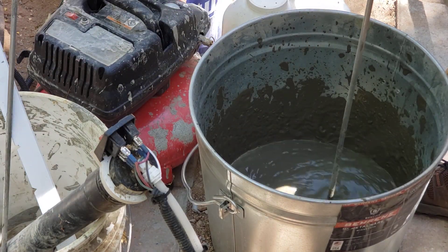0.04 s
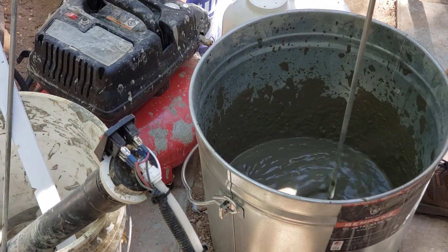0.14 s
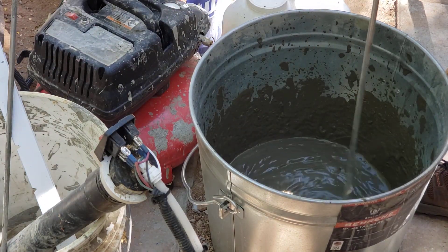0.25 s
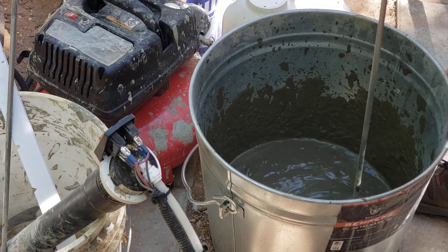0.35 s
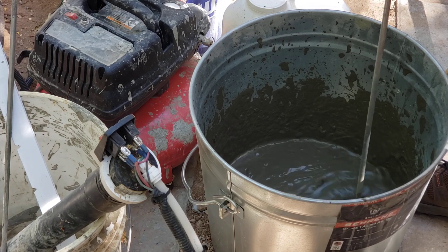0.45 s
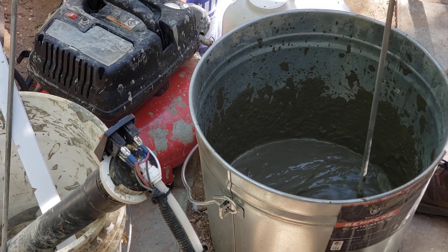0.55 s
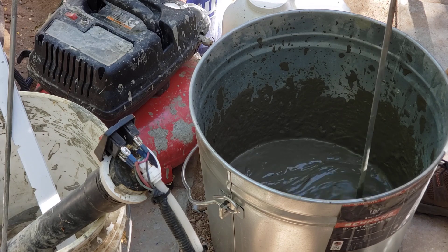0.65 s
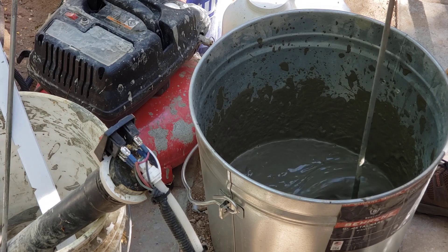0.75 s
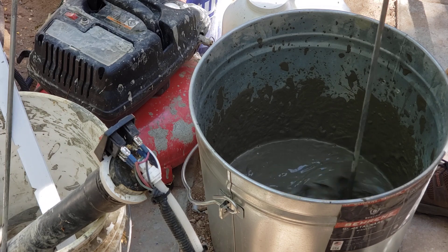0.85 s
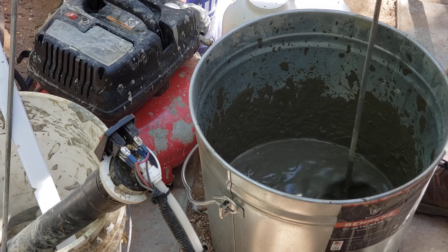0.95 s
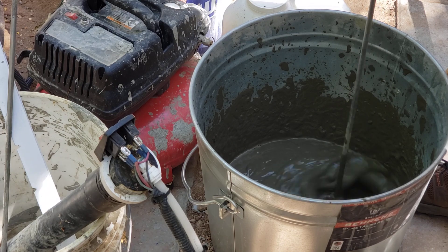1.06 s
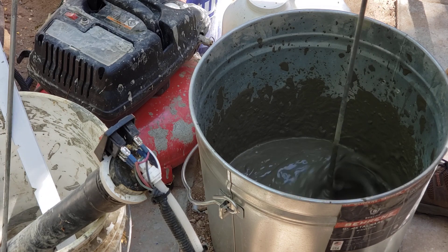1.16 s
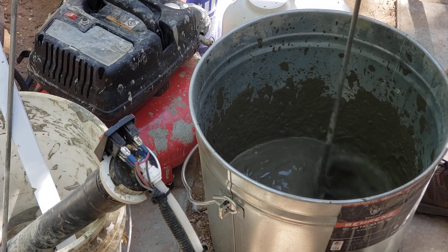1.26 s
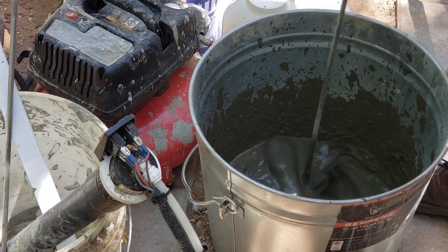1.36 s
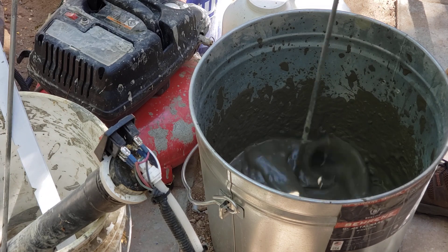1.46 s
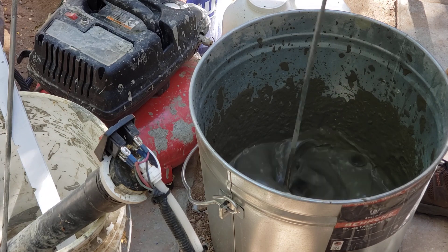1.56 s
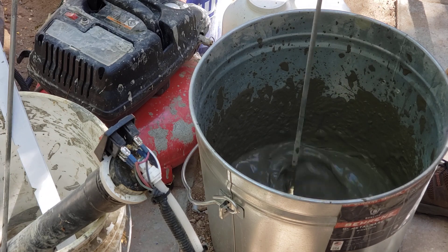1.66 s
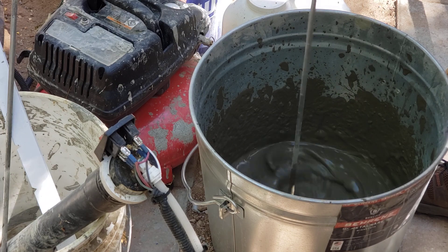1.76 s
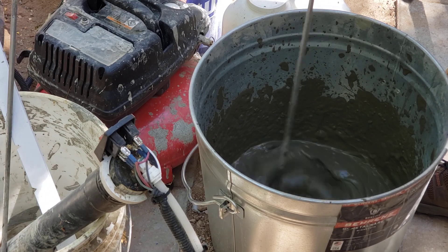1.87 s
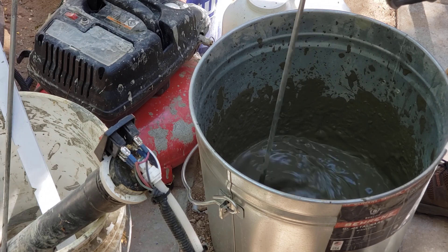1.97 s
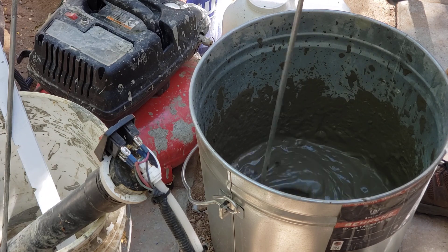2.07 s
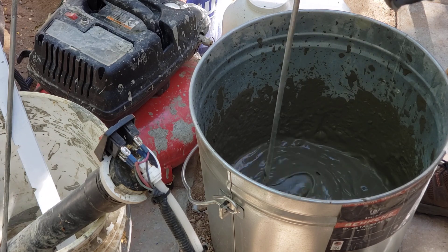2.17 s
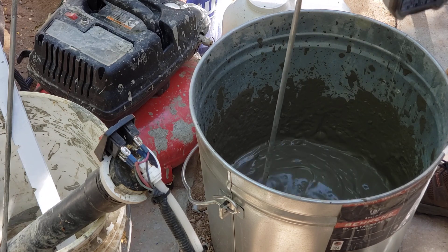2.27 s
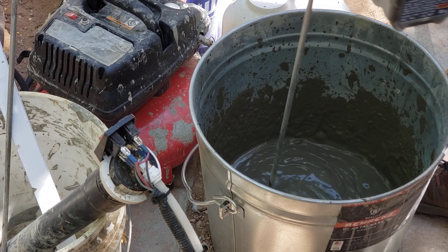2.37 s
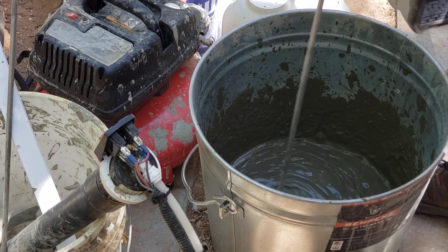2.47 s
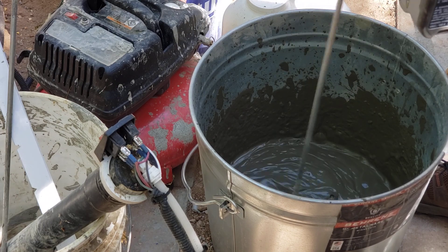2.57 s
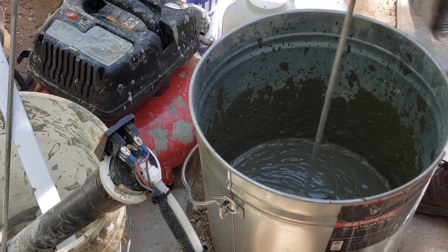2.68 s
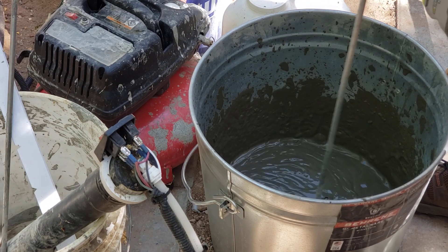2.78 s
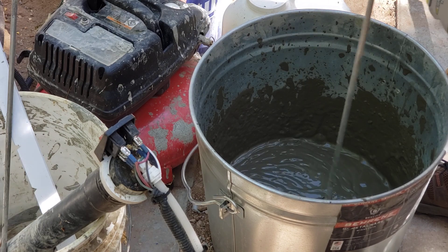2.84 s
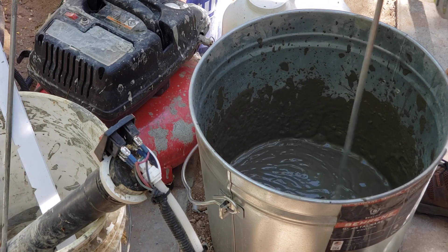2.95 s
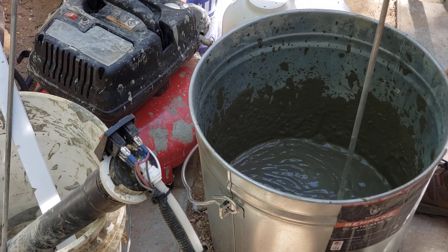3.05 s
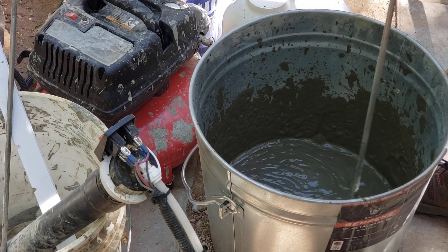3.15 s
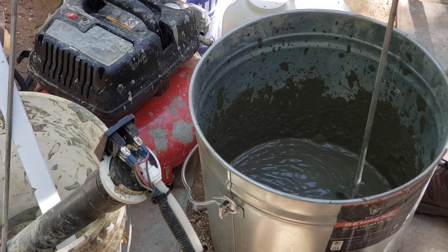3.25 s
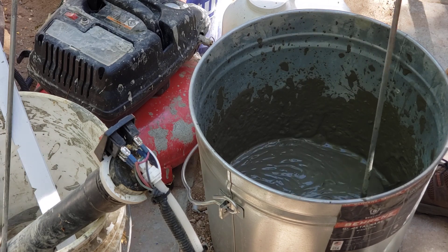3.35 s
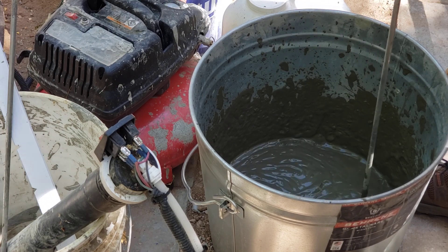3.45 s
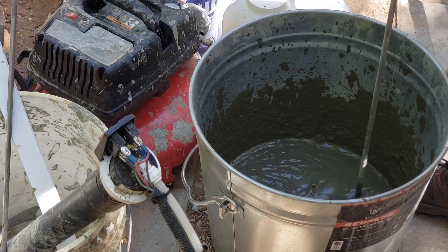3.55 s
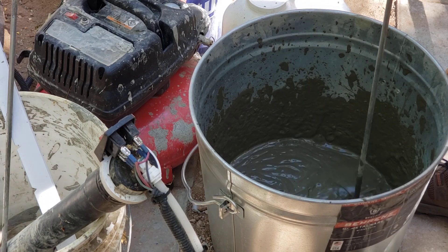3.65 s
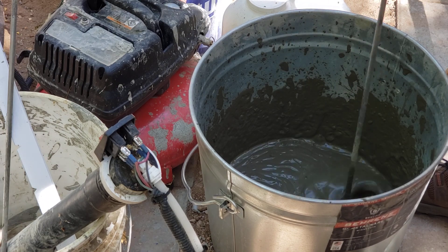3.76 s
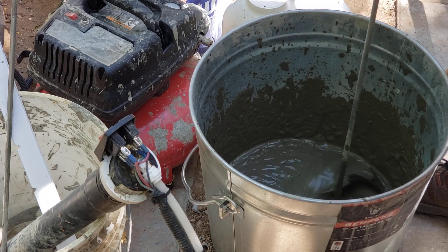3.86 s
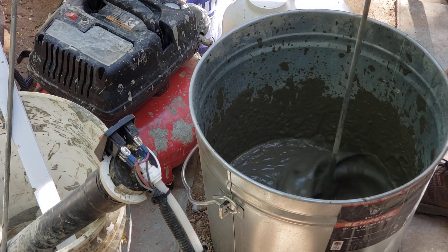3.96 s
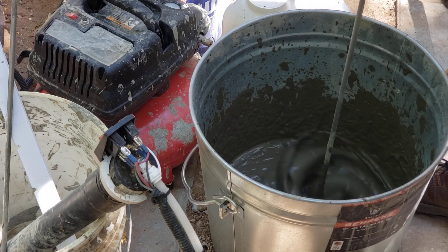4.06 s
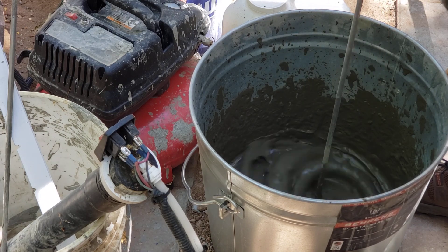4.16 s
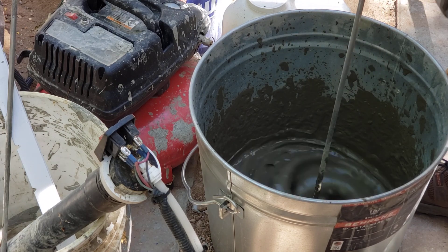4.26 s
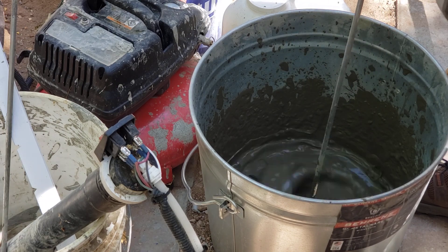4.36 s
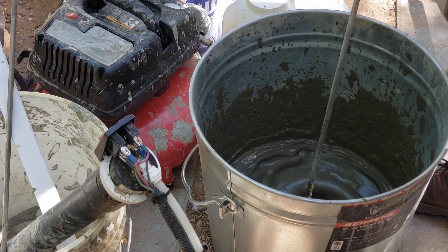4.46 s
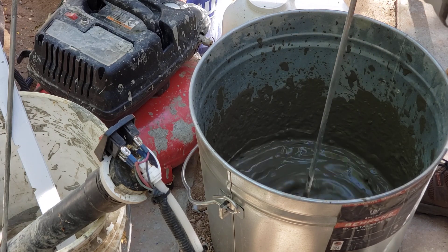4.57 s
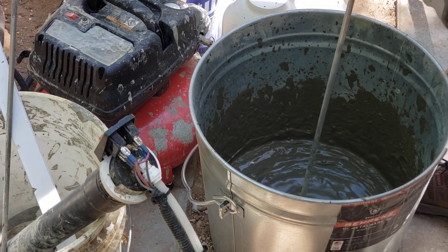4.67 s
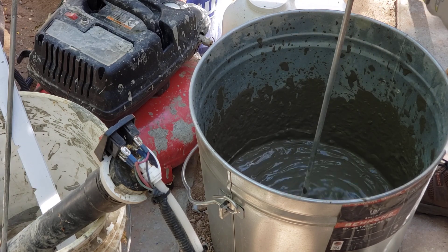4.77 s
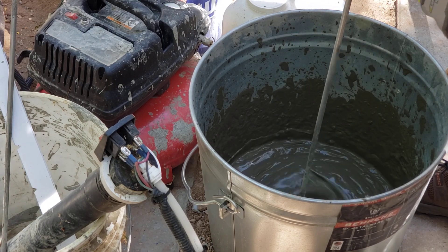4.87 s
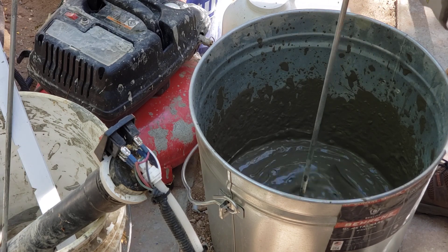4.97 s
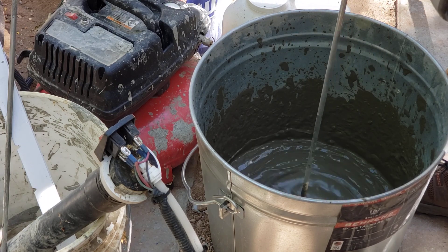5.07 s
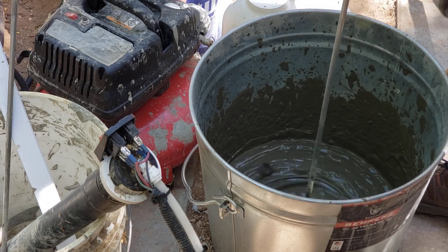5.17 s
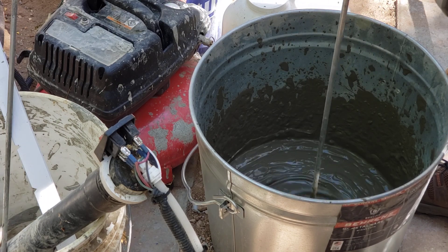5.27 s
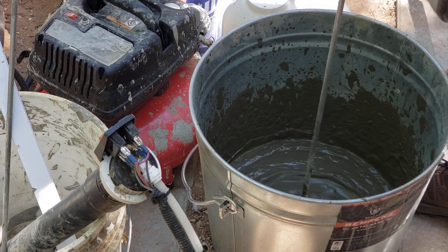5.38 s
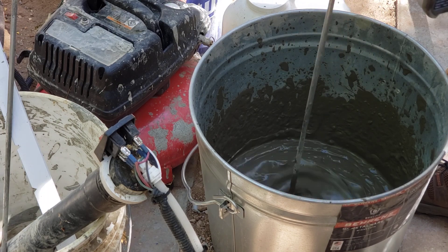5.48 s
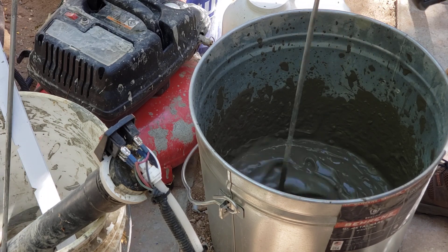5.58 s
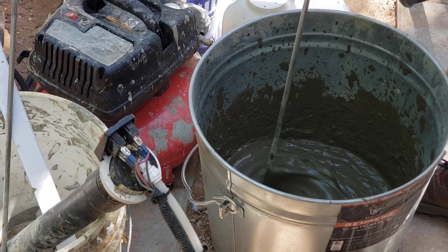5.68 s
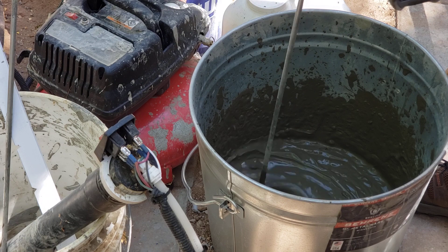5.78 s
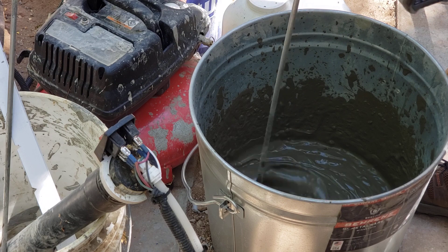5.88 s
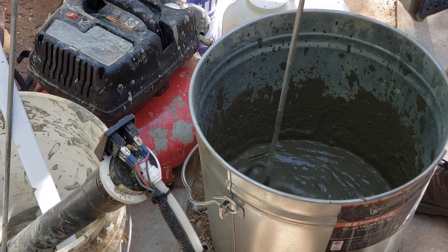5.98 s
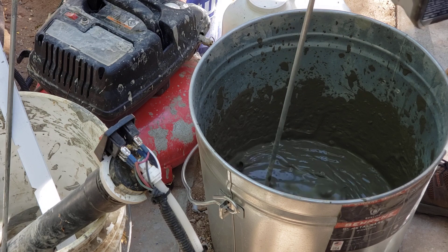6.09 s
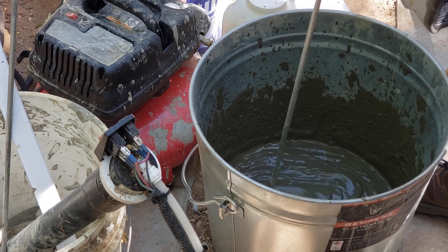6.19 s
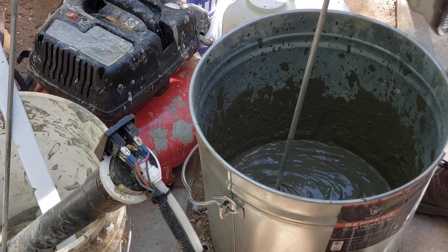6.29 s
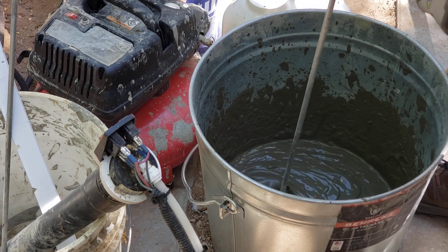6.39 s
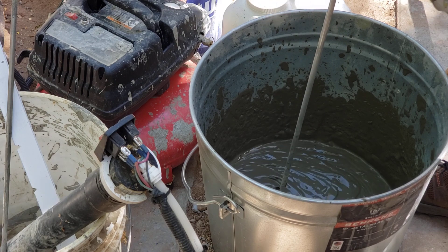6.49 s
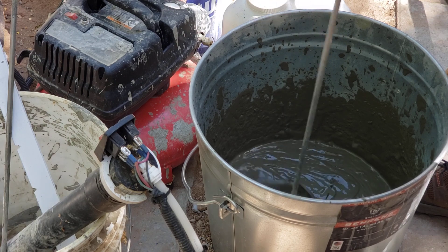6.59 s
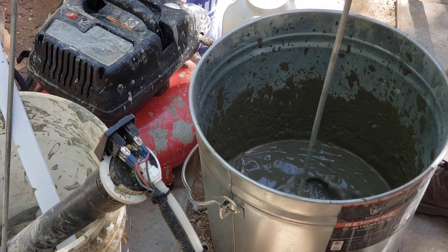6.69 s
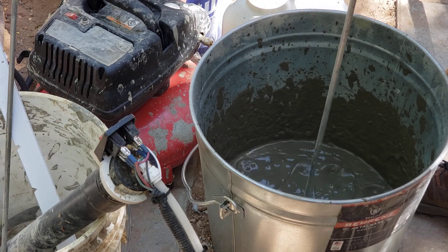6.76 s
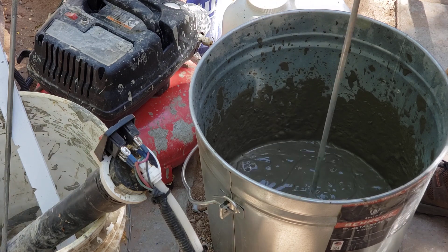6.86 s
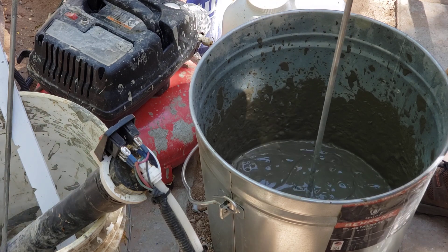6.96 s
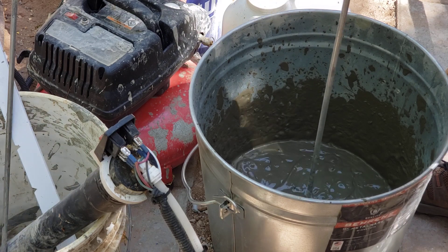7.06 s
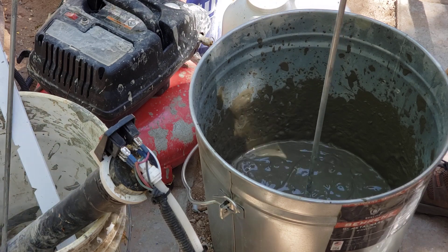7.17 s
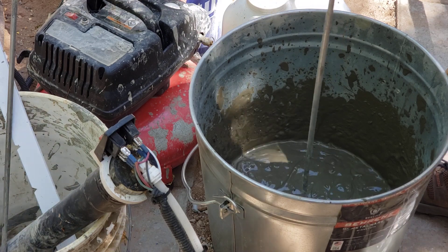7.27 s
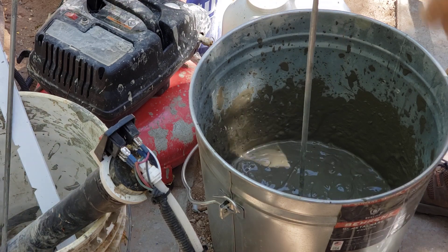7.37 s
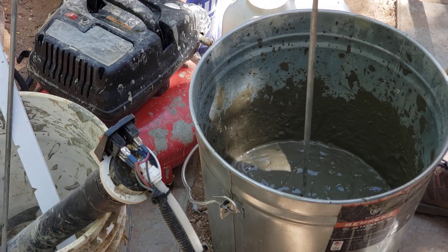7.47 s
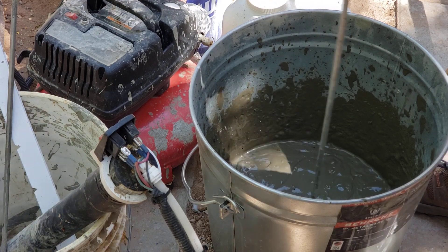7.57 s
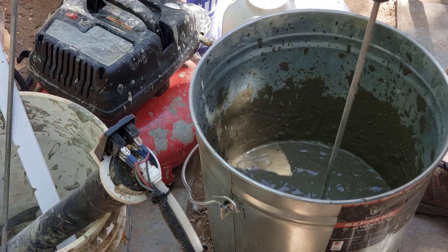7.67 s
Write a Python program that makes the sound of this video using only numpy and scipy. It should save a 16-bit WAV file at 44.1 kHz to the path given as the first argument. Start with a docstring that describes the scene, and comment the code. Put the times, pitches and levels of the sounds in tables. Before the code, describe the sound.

Close, dry outdoor stereo sound of an electric drill mixing cement slurry in a steel bucket. From 0 s the motor runs at full speed: a high, wavering whine around 3.4 kHz, broad rushing fan air, rough gear tones and bright brush hiss. Slurry burbles with scattered hollow plops; gulps thicken from about 1 to 1.8 s, with a hard metal crack at 1.3. From 2.1 to 3.3 s come heavy, rapid, booming glugs and slaps, with a clink at 2.4. From 3.4 to 5.7 s stirring is calmer, with light gulps and small clicks near 3.7 and 4.2. Violent gulping returns from 5.8 to 7.05 s. At 6.8 the trigger is eased and the whine slides down and fades by about 7.3, with last sloshes, a ringing clink at 7.05, tiny drips and a thin switch chirp. Quiet yard hush follows, until the motor starts again at about 7.67.

```python
"""An electric drill spins a mixing paddle in a steel bucket of cement slurry, outdoors, close by.
From the start its fan whines in tones locked to the rotor and its brushes hiss as pulsing noise.
The slurry churns as bubbles and noise, and gulps loudly as closing air pockets ring it and the bucket.
Short cracks and rings, mostly clinks of the paddle, stand out. Near the end the trigger is let go, the
motor runs down, drops fall back, the shaft clinks and the speed switch chirps; the motor starts again."""
import sys
import numpy as np
from scipy import signal
from scipy.fft import rfft, irfft, next_fast_len
from scipy.io import wavfile
from scipy.ndimage import uniform_filter1d, map_coordinates

SR = 44100
rng = np.random.default_rng(int(sys.argv[2]) if len(sys.argv) > 2 else 0)


def materialize(psi):
    """Save the field psi as 16-bit PCM at rate SR to the path in sys.argv[1].

    A 1-D psi becomes a single channel; in a 2-D psi each row is a channel.
    """
    bounded = np.clip(np.atleast_2d(psi).T, -1, 1)
    quanta = np.round(bounded * 32767).astype(np.int16)
    wavfile.write(sys.argv[1], SR, quanta)


N = 340893


def amp(db):
    """Decibels to gain."""
    return 10 ** (np.asarray(db) / 20)


def unit(x):
    """x at rms 1."""
    return x / np.sqrt(np.mean(x ** 2) + 1e-20)


def crest(x, size=350):
    """x with its loudest few milliseconds at rms 1."""
    return x / np.sqrt(uniform_filter1d(x ** 2, size, axis=-1).max() + 1e-20)


def along(points, hz):
    """(Hz, value) points read on a log frequency axis."""
    f, v = np.transpose(points)
    return np.interp(np.log(hz + 1), np.log(f + 1), v)


def curves(rows):
    """One value per sample for each column after the time."""
    s, *cols = np.transpose(rows)
    return [np.interp(np.arange(N) / SR, s, c) for c in cols]


def wobble(rate):
    """A smooth random curve, rate knots a second."""
    return map_coordinates(rng.standard_normal(8192), [np.arange(N) * rate / SR], mode="wrap")


def filtered(x, response):
    """x times a complex response of frequency."""
    n = x.shape[-1]
    m = next_fast_len(n + 3000)
    return irfft(rfft(x, m) * response(np.fft.rfftfreq(m, 1 / SR)), m)[..., :n]


def coloured(x, spectrum):
    """x with a spectrum of (Hz, dB) points, at rms 1."""
    return unit(filtered(x, lambda hz: amp(along(spectrum, hz))))


def resonance(hz, centre, width):
    """The response of one damped mode."""
    return 1j * hz * width / (centre ** 2 - hz ** 2 + 1j * hz * width)


def add(track, s, sound):
    """Mix a sound into a track at time s."""
    part = track[..., max(round(s * SR), 0):][..., :sound.shape[-1]]
    part += sound[..., :part.shape[-1]]


# How alike left and right are. Each row: frequency in Hz, likeness where 1 is identical.
LEFT_RIGHT_LIKENESS = [(100, 0.95), (600, 0.89), (1400, 0.63), (3000, 0.95), (4500, 0.22), (8000, 0.54),
                       (12000, 0.87), (15000, 0.12)]


def spread(pair):
    """Two unrelated signals become left and right, with a likeness that depends on frequency."""
    turn = lambda hz: np.arccos(np.clip(along(LEFT_RIGHT_LIKENESS, hz), -1, 1)) / 2
    mid, side = filtered(pair, lambda hz: np.array([np.cos(turn(hz)), np.sin(turn(hz))]))
    return np.array([mid + side, mid - side])


# Modes of the air in the bucket and its wall.
# Each row: centre in Hz (a shift may detune it), width in Hz, relative level in dB.
BUCKET_MODES = [(108.6, 13, -3.5), (186.2, 11.6, 3.5), (252.5, 18.4, 3), (354, 49, -4.5), (413, 49, -1.5),
                (491, 49, -1.5), (600, 21, 1.5), (696, 35, -10.5), (855, 26, -4.5), (987, 65, -5),
                (1120, 93, -17), (1352, 28, -10), (1660, 330, -44)]


def bucket(x, lo_hz=0, hi_hz=SR, shift=1):
    """x rung through the bucket's modes between two frequencies; shift multiplies their pitch."""
    modes = [mode for mode in BUCKET_MODES if lo_hz <= mode[0] < hi_hz]

    def ringing(hz):
        return sum((-1) ** k * amp(db) * resonance(hz, centre * shift, width)
                   for k, (centre, width, db) in enumerate(modes))

    return filtered(x, ringing)


RELEASE_S, EASE_S = 6.8, 0.26  # the trigger is eased off: when, and how slowly
RESTART_S, SQUEEZE_S = 7.665, 0.066  # it is squeezed again: when, and how slowly
INERTIA_S = 0.13  # time constant of the rotor's lag


def motor():
    """Current and rotor speed, 0-1: the trigger sets the current and the heavy rotor lags behind it."""
    t = np.arange(N) / SR
    easing = np.clip(1 - (t - RELEASE_S) / EASE_S, 0, 1)
    squeezing = np.clip((t - RESTART_S) / SQUEEZE_S, 0, 1) ** 2
    current = easing + squeezing
    keep = np.exp(-1 / (INERTIA_S * SR))
    lagging_drop = signal.lfilter([1 - keep], [1, -keep], 1 - current)
    return current, np.clip(1 - lagging_drop, 0, 1)


# How hard the paddle stirs the slurry. Each row: time in seconds, churn in dB at full rotor speed.
CHURN_LEVEL = [(0.0, -32), (0.64, -49), (1.31, -37), (1.7, -38), (1.88, -34), (2.06, -30.5), (2.31, -56),
               (3.09, -36), (3.24, -35), (3.79, -42), (5.38, -53.5), (6.25, -43.5), (6.36, -46), (6.8, -28)]
# The whole mass is set heaving.
# Each row: start in seconds, end of the hold in seconds, surge level in dB before the layer gains.
HEAVE_SURGES = [(0.0, 0.37, -46.5), (1.19, 1.76, -42.5), (2.055, 3.11, -36), (3.393, 3.917, -45.5),
                (5.773, 6.13, -42.5), (6.173, 6.498, -34), (6.498, 7.035, -39)]
SURGE_RISE_S, SURGE_FALL_S = 0.017, 0.071
CALM_HEAVE_DB, SURGE_CHURN_DB = -56.5, 5.5  # heave between surges; churn against the surge that adds it


def stirring():
    """Gains of churn and heave: surges rise, hold and fall; the paddle's own churn dies with its speed."""
    t = np.arange(N) / SR
    surges = []
    for start, end, db in HEAVE_SURGES:
        rise, fall = (t - start) / SURGE_RISE_S, 1 - (t - end) / SURGE_FALL_S
        surges.append(amp(db) * np.clip(np.minimum(rise, fall), 0, 1))
    surge = np.max(surges, axis=0)
    current, speed = motor()
    paddle = amp(curves(CHURN_LEVEL)[0]) * speed ** 2
    return np.hypot(paddle, amp(SURGE_CHURN_DB) * surge), np.hypot(surge, amp(CALM_HEAVE_DB))


BLADES = 12
LOAD_WAVER, SURGE_WAVER = 0.001054, 0.005  # shares of speed: uneven load, and flutter in the strongest surge
# The blade tone sags as the slurry loads the paddle.
# Each row: time in seconds, pitch in Hz with the trigger held, before it wavers.
LOADED_PITCH = [(0.0, 3275), (0.12, 3355), (0.2, 3368), (0.3, 3416), (0.39, 3410), (0.47, 3452),
                (0.65, 3490), (1.01, 3446), (1.1, 3403), (1.22, 3422), (1.35, 3375), (1.42, 3402),
                (1.63, 3349), (1.71, 3282), (1.85, 3330), (1.99, 3405), (2.14, 3316), (2.35, 3365),
                (2.6, 3395), (2.68, 3355), (2.85, 3380), (2.95, 3422), (3.21, 3449), (3.53, 3457),
                (3.8, 3440), (4.0, 3466), (4.22, 3428), (4.3, 3444), (4.55, 3425), (4.7, 3392),
                (4.92, 3432), (5.2, 3434), (5.34, 3394), (5.5, 3424), (5.66, 3420), (5.91, 3334),
                (6.12, 3400), (6.36, 3282), (6.5, 3295), (6.62, 3355), (6.7, 3305), (6.82, 3375),
                (6.85, 3215), (6.95, 3370)]


def rotor():
    """Blade-passing pitch in Hz and rotor angle in radians, as load and trigger bend the speed."""
    current, speed = motor()
    churning, heaving = stirring()
    # while the mass heaves, the blades catch and slip and the speed flutters
    flutter = SURGE_WAVER * (heaving / heaving.max()) ** 2 * wobble(45)
    blade_hz = curves(LOADED_PITCH)[0] * speed * (1 + LOAD_WAVER * wobble(9) + flutter)
    jittered_hz = blade_hz * (1 + 0.0015 * wobble(30))
    return blade_hz, 2 * np.pi * np.cumsum(jittered_hz) / BLADES / SR


# The blade tone's fader.
# Each row: time in seconds, level in dB before its gain and the effects of speed and housing.
WHINE_LEVEL_CURVE = [(0.0, -43), (0.3, -42.5), (0.53, -42.5), (0.76, -47), (0.86, -42), (1.27, -39),
                     (1.78, -42.5), (2.05, -39.5), (2.13, -46), (2.24, -41.5), (2.6, -40), (2.87, -47),
                     (3.1, -47), (3.34, -54.5), (3.53, -44.5), (4.75, -42.5), (4.79, -49), (4.87, -51),
                     (4.9, -42), (5.83, -38), (6.3, -42.5), (6.76, -42.5), (6.87, -41), (6.9, -49),
                     (6.95, -42)]
WHINE_DB, WHINE_LAW = 1.5, 3.4  # gain on the curve; the power of speed the tone grows as
HOUSING_HZ, HOUSING_WIDTH_HZ, HOUSING_DB = 2600, 230, 8  # resonance, its width, gain it adds to unity


def whine(blade_hz, angle, speed):
    """The fan blades sing at their passing rate, flaring as the pitch crosses the housing's resonance."""
    level = amp(curves(WHINE_LEVEL_CURVE)[0] + WHINE_DB + 1.22 * wobble(30))
    phases, sides = np.array([[0.7], [0]]), amp([[1.5], [-1.5]])  # left leads and is 3 dB louder
    tone = level * np.sqrt(2) * np.sin(BLADES * angle + phases) * sides
    housing = 1 + amp(HOUSING_DB) * np.exp(-((blade_hz - HOUSING_HZ) / HOUSING_WIDTH_HZ) ** 2)
    return tone * housing * speed ** WHINE_LAW


# Tones locked to the rotor. Each row: multiple of its turn rate, relative level in dB before it drifts.
ROTOR_ORDERS = [(11, -18), (20, -16), (24, -26), (25, -12), (27, -19), (37, -9.5), (47, -5)]
# The gear tone sings under load. Each row: time in seconds, level in dB at full rotor speed.
GEAR_LEVEL_CURVE = [(0, -57), (1.55, -62), (1.75, -46), (2.0, -45), (2.9, -57), (5.3, -54), (5.7, -53),
                    (6.8, -58)]
# The drill is swung about over the bucket. Each row: time in seconds, level of the fan air in dB,
# level of the brush hiss in dB, both before their gains and the motor's effect.
DRILL_SWING = [(0.03, -35.5, -32.5), (0.07, -36.5, -31), (2.42, -34.5, -35.5), (2.8, -35.5, -33),
               (3.23, -37.5, -33), (4.12, -36.5, -33.5), (4.91, -38, -33), (5.57, -35, -34.5),
               (5.89, -33.5, -34), (6.61, -36.5, -33.5), (6.8, -35, -30)]
GEAR_ORDER = 15
FREE_HZ, ORDER_DB_PER_HZ = 3440, 0.05  # the orders fade as load pulls the blade pitch below this one


def rotor_tones(angle, speed):
    """Multiples of the turn rate and a gear tone, smeared by rattle in the bearings."""
    # each tone reaches the two ports at a drifting phase
    sway = lambda k: np.array([1.2 * wobble(9) + k / 42 * wobble(330) for port in "LR"])
    orders = sum(amp(db + 2 * wobble(8)) * np.sin(round(k) * angle + sway(k)) for k, db in ROTOR_ORDERS)
    orders *= amp(ORDER_DB_PER_HZ * (curves(LOADED_PITCH)[0] - FREE_HZ))
    gear = amp(curves(GEAR_LEVEL_CURVE)[0]) * np.sqrt(2) * np.sin(GEAR_ORDER * angle + sway(GEAR_ORDER))
    air_db, brush_db = curves(DRILL_SWING)
    return (orders * amp(air_db + 2) + gear) * speed ** 6


def shifting(x, patchy_db):
    """x with its colour drifting in patches, as turbulent air does."""
    z = signal.stft(x, nperseg=512)[2]
    field = rng.standard_normal(z.shape[1:])
    field = uniform_filter1d(uniform_filter1d(field, size=5, axis=0), size=22, axis=1)
    return signal.istft(z * amp(patchy_db * unit(field)), nperseg=512)[1][:, :N]


# Colour of the fan air and gear noise. Each row: frequency in Hz, relative density in dB per Hz.
AIR_COLOUR = [(60, -13), (300, -4.5), (600, 3), (950, 3), (1200, 1), (1400, 3), (1900, 0.5), (2500, 5),
              (3100, 5), (3600, 1.5), (4300, 4), (5200, 1.5), (7000, 2.5), (11000, -22.5)]
AIR_DB, AIR_PATCHY_DB = 4.0, 1.3  # gain on the curve; depth of the drifting patches
AIR_LAW, STRAIN_DB = 2, 2  # power of speed; gears straining as the rotor picks up


def fan_air(angle, current, speed):
    """Rushing air and gear noise, pulsing eight times a turn and straining while current leads speed."""
    noise = shifting(rng.standard_normal((2, N)), AIR_PATCHY_DB) * (1 + 0.12 * np.sin(8 * angle))
    air_db, brush_db = curves(DRILL_SWING)
    level = amp(air_db + AIR_DB + 0.65 * wobble(25))
    strain = amp(STRAIN_DB) * np.maximum(current - speed, 0)
    return spread(coloured(noise, AIR_COLOUR)) * level * (speed ** AIR_LAW + strain)


# Colour of the brush hiss. Each row: frequency in Hz, relative density in dB per Hz.
BRUSH_COLOUR = [(1500, -40), (5000, -22), (7000, -21), (9500, -4), (10300, -4), (10700, 2), (11600, -4),
                (13000, -2.5), (13700, 2), (14500, 5), (15700, 3)]
BRUSH_DB, DRY_BRUSH_DB = 5.5, -19.5  # gain on the curve; brushes rubbing without current
SPARK_LAW, RUB_LAW = 0.99, 0.77  # sparks grow as this power of current, rubbing as this power of speed


def brushes(angle, current, speed):
    """Random brush sparks pulse with the rotor over the repeating texture of the worn commutator."""
    # brush pressure varies round each turn
    contact = 1 + 0.2 * np.sin(4 * angle) + 0.15 * np.sin(2 * angle) + 0.13 * np.sin(3 * angle)
    place = angle * 150 / (2 * np.pi) % 150
    worn = np.array([map_coordinates(rng.standard_normal(150), [place], mode="grid-wrap") for port in "LR"])
    sparks = rng.standard_normal((2, N)) * contact * amp(1.5 * wobble(1000)) + 0.2 * worn
    air_db, brush_db = curves(DRILL_SWING)
    hiss = spread(coloured(sparks, BRUSH_COLOUR)) * amp(brush_db + BRUSH_DB + 0.38 * wobble(8.1))
    return hiss * np.maximum(current ** SPARK_LAW, amp(DRY_BRUSH_DB) * speed ** RUB_LAW)


def drill():
    """One motor drives the fan tone, rotor tones, rushing air and brush hiss together."""
    current, speed = motor()
    blade_hz, angle = rotor()
    tones = whine(blade_hz, angle, speed) + rotor_tones(angle, speed)
    return tones + fan_air(angle, current, speed) + brushes(angle, current, speed)


def bubble(t, hz, life, rise):
    """An air pocket rings, its pitch climbing as it nears the surface."""
    pitch = hz * (1 + rise * (np.minimum(t / life, 1) - 0.2))
    ring = np.sin(2 * np.pi * np.cumsum(pitch, -1) / SR)
    return ring * amp(-60 * t / life) * (1 - np.exp(-t * hz / 0.5))


# Colour of the heaving mass. Each row: frequency in Hz, relative density in dB per Hz.
HEAVE_COLOUR = [(20, -29), (40, -38), (60, 3.5), (85, -9.5), (120, -2.5), (200, -5.5), (500, -56)]
SETTLE_DB = -63.5  # a steady murmur that stays when the paddle rests


def churn(count=800):
    """Small bubbles and folding slurry murmur in the bucket while the whole mass heaves."""
    churning, heaving = stirring()
    t = np.arange(SR // 12) / SR
    bubbles = np.zeros(N)
    for when, pitch, size in rng.uniform(size=(count, 3)):
        hz = 280 * 5 ** pitch
        add(bubbles, when * N / SR, amp(11.0 * size - 3 * pitch) * bubble(t, hz, 26 / hz, rise=0.55))
    folds = spread(unit(bucket(rng.standard_normal((2, N)) * amp(6.3 * wobble(35)))))
    murmur = amp(-6.0) * folds + amp(-5.5) * unit(bubbles)
    heave = spread(coloured(rng.standard_normal((2, N)), HEAVE_COLOUR))
    return murmur * churning + folds * amp(SETTLE_DB) + heave * heaving * amp(1.5)


# Colour of the quiet yard. Each row: frequency in Hz, relative density in dB per Hz.
YARD_COLOUR = [(15, -58), (25, -25), (39, -18.5), (66, -8.5), (90, -15), (109, -18), (2780, -51),
               (3180, -59), (6540, -43.5), (8780, -61), (15000, -66)]
# Faint narrow tones that stand in the quiet. Each row: centre in Hz, width in Hz, relative level in dB.
STANDING_TONES = [(2870, 31, 5), (3970, 22, 1), (5770, 40, -11)]
YARD_DB, STANDING_TONES_DB = -49, -78


def quiet_yard():
    """Steady coloured noise, with noise through narrow resonances for the faint tones."""
    bed = amp(YARD_DB) * spread(coloured(rng.standard_normal((2, N)), YARD_COLOUR))
    ringing = lambda hz: sum(amp(db) * resonance(hz, c, w) for c, w, db in STANDING_TONES)
    tones = filtered(rng.standard_normal((2, N)), ringing)
    return bed + amp(STANDING_TONES_DB) * unit(tones)


PLOP_SHAPE, PLOP_CLIMB = 1.27, 0.041  # how round its swell is; octaves it climbs per swell time


def plop(t, hz, swell):
    """A big pocket is pinched off: its tone swells, dies away and climbs a little."""
    u = t / swell
    pitch = hz * 2 ** (PLOP_CLIMB * (np.minimum(u, 5) - 1))
    return np.sin(2 * np.pi * np.cumsum(pitch) / SR) * (u * np.exp(1 - u)) ** PLOP_SHAPE


def gurgle(t, hz, life, climb):
    """The hollow behind a blade closes: a rough, narrow resonance that slides upward."""
    pitch = hz * 2 ** (climb * (np.minimum(t / life, 1) - 0.25))
    angle = 2 * np.pi * np.cumsum(pitch) / SR
    a, b = (map_coordinates(rng.standard_normal(64), [t * 220], mode="nearest") for part in "ab")
    rough = (1 + 1.8 * a) * np.sin(angle) + 1.34 * b * np.cos(angle)
    return rough * (1 - np.exp(-t / 0.0033)) * amp(-30 * t / life)


WASH_T60_S, WASH_RISE_S = 0.16, 0.007  # decay and rise of the falling slurry
WASH_LUMPY_DB = 8  # how unevenly it falls
SLOSH_DETUNE = 0.07  # scale of the share by which the sloshing surface detunes the bucket


def wash(t):
    """Slurry falls back in lumps and keeps the bucket's upper modes ringing."""
    lumps = amp(WASH_LUMPY_DB * map_coordinates(rng.standard_normal(64), [t * 200], mode="nearest"))
    envelope = (1 - np.exp(-t / WASH_RISE_S)) * amp(-60 * t / WASH_T60_S)
    flow = rng.standard_normal((2, len(t))) * lumps * envelope
    return bucket(flow, lo_hz=300, shift=1 + SLOSH_DETUNE * rng.uniform(-1.17, 1))


POCKET_HZ = 482  # a middling pocket
PUSH_SWELLS = 0.99  # how long the closing pocket pushes on the bucket, in swell times
# boom against the pocket's peak, its change per octave above middling, and what full violence adds
BOOM_DB, BOOM_DB_PER_OCTAVE, VIOLENT_BOOM_DB = -21, -16.5, 9
# the bucket's middle modes likewise, but losing level both above and below a middling pocket
BODY_DB, BODY_DB_PER_OCTAVE, VIOLENT_BODY_DB = -10.5, -7.5, 4.5
# Colour of flying droplets. Each row: frequency in Hz, relative density in dB per Hz.
DROPLET_COLOUR = [(600, -33), (1000, 5), (1500, 12), (2200, 5.5), (4000, 2), (8000, -2), (15000, -7)]
SLAP_DB, SPRAY_DB = -5, -5.5  # wall and droplets against the slap level


def knock(t, db, hz, slap_db, swell, violence):
    """A closing pocket shoves the bucket into ringing, slaps its wall and throws droplets."""
    octaves = np.log2(hz / POCKET_HZ)
    # one sudden push as the pocket closes, after which the bucket rings freely
    push = lambda: rng.standard_normal((2, len(t))) * np.exp(-(t / (PUSH_SWELLS * swell)) ** 2)
    burst = lambda life: rng.standard_normal((2, len(t))) * (1 - np.exp(-t / 0.0011)) * amp(-60 * t / life)
    boom_db = db + BOOM_DB + BOOM_DB_PER_OCTAVE * max(octaves, 0) + VIOLENT_BOOM_DB * violence
    boom = amp(boom_db) * crest(bucket(push(), hi_hz=300))
    body_db = db + BODY_DB + BODY_DB_PER_OCTAVE * abs(octaves) + VIOLENT_BODY_DB * violence
    body = amp(body_db) * crest(bucket(push(), lo_hz=300, hi_hz=790))
    slap = amp(slap_db + SLAP_DB) * crest(bucket(burst(0.062), lo_hz=790))
    droplets = amp(4 * np.repeat(rng.standard_normal(len(t)), 40)[:len(t)])
    spray = amp(slap_db + SPRAY_DB) * crest(coloured(burst(0.068) * droplets, DROPLET_COLOUR))
    return boom + body + slap + spray


SMALL_DB, SMALL_SCATTER_DB, SMALL_SLAP_DB = -32.5, 7, -3  # peak, its scatter each way, slap against peak
SMALL_LOW_HZ, SMALL_OCTAVES = 301.3, 1.8  # lowest pitch and range
SMALL_FOLLOWS = 0.16  # dB of peak for each dB of churn


def small_gulps(count=46):
    """Small pockets close at uneven times until the release, stronger the harder the paddle churns."""
    when, pitch, size = rng.uniform(size=(count, 3)).T
    s = (np.arange(count) + when) / count * RELEASE_S
    churn_db = np.interp(s, *np.transpose(CHURN_LEVEL))
    db = SMALL_DB + SMALL_FOLLOWS * (churn_db - churn_db.mean()) + SMALL_SCATTER_DB * (1 - 2 * size)
    hz = SMALL_LOW_HZ * 2 ** (SMALL_OCTAVES * pitch)
    return list(zip(s, db, hz, db + SMALL_SLAP_DB, np.full(count, 0.005)))


# Air pockets closing. Each row: start in seconds, reference peak in dB, pocket pitch in Hz,
# reference slap in dB, swell in seconds; each layer sets its gain against these levels.
AIR_POCKETS = [(0.008, -25, 174, -45, 0.0074), (0.029, -30, 1220, -46, 0.005),
               (0.221, -20.5, 1130, -40, 0.0029), (0.393, -20.5, 426, -30.5, 0.0049),
               (0.587, -36, 710, -49, 0.005), (0.791, -18.5, 714, -32, 0.0031),
               (0.893, -27, 482, -37, 0.006), (1.004, -21.5, 810, -39, 0.002),
               (1.065, -20, 600, -26.5, 0.0041), (1.105, -22, 900, -24.5, 0.0048),
               (1.162, -26, 558, -29, 0.0041), (1.235, -14, 350, -38, 0.002),
               (1.237, -17.5, 128, -55, 0.0071), (1.276, -18, 375, -29, 0.0055),
               (1.305, -11.5, 1070, -28, 0.0021), (1.378, -23, 336, -66, 0.0083),
               (1.388, -25, 125, -44, .008), (1.4, -25, 634, -44, .004), (1.43, -22, 954, -33, 0.0048),
               (1.497, -22, 860, -27, 0.0051), (1.563, -21, 246, -32, .005), (1.589, -20, 600, -53, .006),
               (1.618, -24, 256, -44, 0.011), (1.635, -24, 643, -30, 0.016),
               (1.658, -24.5, 193, -43, 0.017), (1.704, -26, 910, -39, 0.0047),
               (1.763, -23, 527, -32, 0.01), (1.818, -15.5, 430, -31, 0.0026),
               (1.945, -20, 512, -35, 0.0038), (2.1, -9, 394, -26.5, 0.0027),
               (2.107, -12.5, 433, -38, 0.011), (2.172, -8, 466, -25, 0.0028), (2.19, -19, 660, -40, 0.006),
               (2.301, -8.5, 422, -33, 0.0039), (2.361, -16.5, 380, -26, 0.0067),
               (2.391, -21, 1047, -31, 0.0038), (2.491, -14, 495, -32.5, 0.0072),
               (2.518, -10.5, 280, -21.5, 0.0039), (2.53, -15.5, 255, -38, 0.0085),
               (2.553, -25, 594, -41.5, 0.0053), (2.593, -17.5, 600, -30, 0.008),
               (2.622, -11, 593, -25, 0.0078), (2.648, -13, 1030, -48, 0.0024),
               (2.708, -10, 415, -24, 0.0021), (2.717, -10, 652, -36, 0.0044),
               (2.779, -22, 597, -27.5, 0.0053), (2.837, -7.5, 454, -30, 0.0045),
               (2.846, -14, 182, -43, 0.013), (2.963, -9, 410, -23, 0.0093), (2.966, -15, 182, -43, 0.016),
               (3.04, -22, 1090, -43, 0.0029), (3.075, -21, 847, -33.5, 0.0051),
               (3.092, -9.5, 618, -16, 0.0035), (3.1, -7.5, 440, -25, 0.0013),
               (3.104, -14, 200, -47, 0.013), (3.143, -31, 340, -40, .005), (3.172, -30, 514, -37, 0.01),
               (3.199, -30, 796, -28.5, 0.0045), (3.262, -30, 387, -46, 0.0099),
               (3.286, -17.5, 532, -20.5, 0.0064), (3.3, -16, 402, -48, 0.0043),
               (3.439, -22.5, 340, -28, 0.0032), (3.578, -21.5, 502, -33, 0.0026),
               (3.65, -25, 273, -30, 0.0046), (3.688, -18, 879, -24.5, 0.0075),
               (3.828, -27, 1410, -42, .004), (3.898, -23.5, 329, -42, 0.0032),
               (4.123, -26.5, 1436, -49, 0.0049), (4.167, -22, 650, -27, 0.0022),
               (4.208, -30, 386, -54, 0.0041), (4.276, -24.5, 820, -43, 0.0039),
               (4.385, -22, 567, -31.5, 0.0063), (4.452, -27, 1010, -42, 0.0045),
               (4.554, -28, 286, -49, 0.0098), (4.637, -26, 482, -29.5, 0.011),
               (4.662, -27, 596, -38, 0.014), (4.72, -29, 480, -51, 0.014), (4.774, -19.5, 495, -40, 0.005),
               (4.795, -23.5, 740, -30, 0.0055), (5.48, -30, 306, -38, 0.012),
               (5.529, -26, 594, -35, 0.0055), (5.56, -22.5, 712, -32, 0.0062),
               (5.614, -21, 960, -38, 0.0024), (5.75, -22, 624, -46, 0.005), (5.812, -28, 590, -30, 0.0071),
               (5.836, -8.5, 315, -25, 0.0023), (5.851, -13, 372, -33, 0.0089),
               (5.888, -16.5, 610, -27, 0.0094), (5.962, -11.5, 562, -22, 0.011),
               (5.963, -15, 1060, -27, .004), (6.169, -11, 436, -24, 0.0053), (6.178, -17, 1006, -33, .006),
               (6.19, -17, 430, -35, 0.0067), (6.227, -8.5, 428, -31, 0.0096),
               (6.292, -9.5, 419, -22.5, 0.0055), (6.364, -7, 348, -36, 0.0023),
               (6.373, -16, 700, -33, 0.0053), (6.393, -14, 580, -29, 0.0088),
               (6.439, -11.5, 483, -17, 0.0028), (6.448, -11, 682, -32, .006),
               (6.469, -18, 960, -40, 0.0033), (6.498, -12, 685, -18, 0.0082),
               (6.512, -13.5, 241, -37, 0.017), (6.569, -21.5, 584, -34, 0.0059),
               (6.599, -14.5, 1033, -18.5, 0.0078), (6.693, -11, 596, -16, 0.0067),
               (6.705, -15, 533, -35, 0.0047), (6.775, -19.5, 608, -23, 0.021),
               (6.827, -10.5, 916, -19, 0.004), (6.898, -13, 535, -24, 0.0034),
               (6.95, -8, 863, -16.5, 0.0053), (6.975, -16.5, 640, -26, 0.0064),
               (7.007, -19, 256, -38, 0.0093), (7.032, -13.5, 1053, -25, 0.0031)]
PLOP_DB, GURGLE_DB, WASH_DB = -8.5, -12, -18.5  # against the peak, before violence and speed act
GURGLE_LOSS_DB = 15  # gurgle that the most violent pockets lose
SHED_DB = -0.5  # shed bubbles against the slap, before they fade with delay


def gulps(count=2):
    """Each pocket knocks the bucket, plops and gurgles; slurry washes back into the violent ones."""
    out, t = np.zeros((2, N)), np.arange(SR // 8) / SR
    current, speed = motor()
    for s, db, hz, slap_db, swell in list(AIR_POCKETS) + small_gulps():
        violence = np.clip((db + 26) / 20, 0, 1)
        turning = speed[round(s * SR)] ** 2
        sound = knock(t, db, hz, slap_db, swell, violence)
        if violence > 0:
            sound += turning * violence * amp(db + WASH_DB) * crest(wash(t))
        # violent pockets go with one round plop; gentle ones gurgle more, if the blades turn fast
        sound[0] += amp(db + PLOP_DB + 1.25 * violence) * crest(plop(t, hz, swell))
        gurgle_gain = turning * amp(db + GURGLE_DB - GURGLE_LOSS_DB * violence)
        sound[0] += gurgle_gain * crest(gurgle(t, hz, life=0.07, climb=0.7))
        add(out, s, sound)
        # the pocket sheds a few small bubbles just after it
        for delay, pitch in rng.uniform(size=(count, 2)):
            small_hz = 650 * 2 ** pitch
            shed = crest(bubble(t, small_hz, 32 / small_hz, rise=0.5))
            add(out[0], s + 0.03 * delay, turning * amp(slap_db + SHED_DB - 16.0 * delay) * shed)
    return spread(out)


# Short cracks and rings: mostly the paddle touching the bucket; the one at 6.698 s is a splash-like slap.
# Each row: start in seconds, level in dB before an 11 dB cut, ring pitch in Hz,
# time in seconds for the ring's drive to fall 60 dB.
CRACKS_AND_RINGS = [(1.305, -7.5, 3240, 0.018), (1.433, -12, 8350, 0.025), (2.425, -9, 2590, 0.088),
                    (3.665, -14, 4800, 0.027), (3.698, -15.5, 3930, 0.041), (4.197, -16, 5550, 0.038),
                    (4.278, -20.5, 4500, 0.027), (6.698, -13, 1700, 0.053), (6.967, -18, 7200, 0.036),
                    (7.045, -13, 4430, 0.07), (7.047, -31, 4400, 0.41), (7.29, -48, 4000, 0.05),
                    (7.332, -39, 1730, 0.039)]


def clinks_and_slap():
    """Mostly steel on wet steel: a short crack and a soon-damped ring; one lower hit is a splash-like slap."""
    out, t = np.zeros((2, N)), np.arange(SR // 4) / SR
    for s, db, hz, life in CRACKS_AND_RINGS:
        crack, tail = rng.standard_normal((2, 2, len(t)))
        # the sooner the slurry damps a contact, the broader and drier its crack
        damped = 0.12 * (0.05 / life) ** 2
        crack_modes = lambda f: resonance(f, hz, 0.3 * hz) ** 2 + damped * resonance(f, hz, 1.2 * hz)
        ring = filtered(crack * amp(-60 * t / 0.02), crack_modes)
        ring += filtered(tail * amp(-9 - 60 * t / life), lambda f: resonance(f, hz, 0.25 * hz) ** 2)
        add(out, s, amp(db - 11.0) * crest(ring))
    return spread(out)


# Drops falling back once the paddle slows.
# Each row: start in seconds, level in dB, bubble pitch in Hz around which it climbs.
FALLING_DROPS = [(7.157, -49, 985), (7.193, -46.5, 990), (7.652, -53, 905)]


def drips():
    """Each drop traps one small bubble in the slurry."""
    out, t = np.zeros((2, N)), np.arange(SR // 10) / SR
    for s, db, hz in FALLING_DROPS:
        add(out, s, amp(db) * crest(bubble(t, hz, life=0.047, rise=0.17)))
    return out


# The speed switch. Each row: start in seconds, level in dB, pitch in Hz.
SWITCH_CHIRPS = [(7.3, -47, 15700), (7.667, -39, 15100)]


def trigger():
    """The speed switch gives a thin, high chirp: a burst of noise through a narrow resonance."""
    out, t = np.zeros(N), np.arange(SR // 10) / SR
    for s, db, hz in SWITCH_CHIRPS:
        burst = rng.standard_normal(len(t)) * (1 - np.exp(-t / 0.004)) * amp(-60 * t / 0.074)
        squeal = filtered(burst, lambda f: resonance(f, hz, 348) ** 2)
        add(out, s, amp(db) * crest(squeal))
    return out


def scene():
    """Drill, slurry and the quiet yard with its faint steady tones."""
    return drill() + churn() + quiet_yard() + gulps() + clinks_and_slap() + drips() + trigger()


# The microphone's dip. Each row: frequency in Hz, gain in dB.
MIC_DIP = [(7150, -2), (7500, -3.5), (8200, -9), (9000, -2), (9800, -2)]
# Balance of the two ports. Each row: frequency in Hz, left minus right in dB.
PORT_TILT = [(100, -1), (300, -2.5), (600, 0), (3400, 0.1), (6000, -.5), (10800, 0), (12500, -1.5),
             (14000, -4.5)]
TOP_HZ, PORT_LAG_S = 15800, 68e-6  # the treble ends here; left arrives this much after right


def record(dry):
    """Sound reaches the right port first; the ports colour it and the top is cut off."""
    sides = np.array([[1], [-1]])
    lag = lambda hz: np.exp(-sides * 1j * np.pi * hz * PORT_LAG_S)
    ports = lambda hz: amp(along(MIC_DIP, hz) + sides * along(PORT_TILT, hz) / 2)
    return filtered(dry, lambda hz: ports(hz) * lag(hz) * (hz < TOP_HZ))


dry = scene()
out = record(dry)
materialize(out)
```